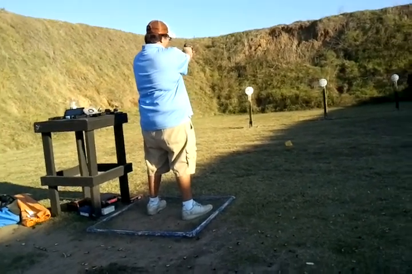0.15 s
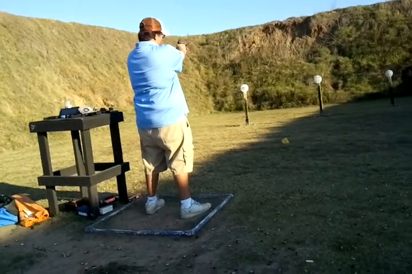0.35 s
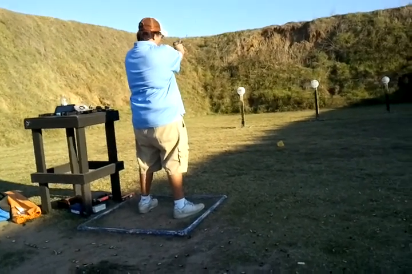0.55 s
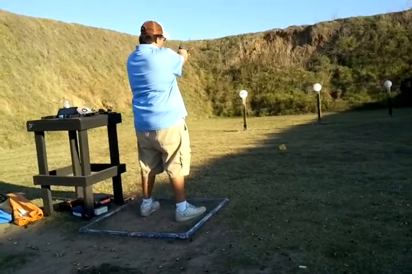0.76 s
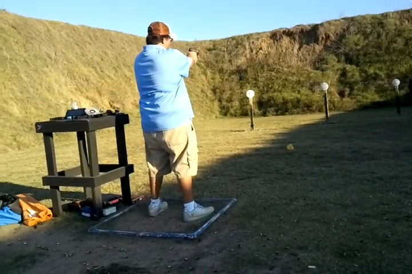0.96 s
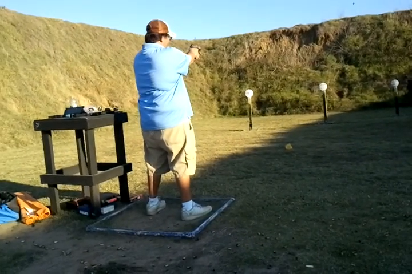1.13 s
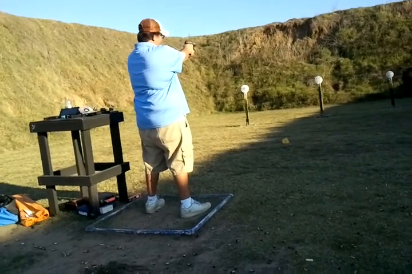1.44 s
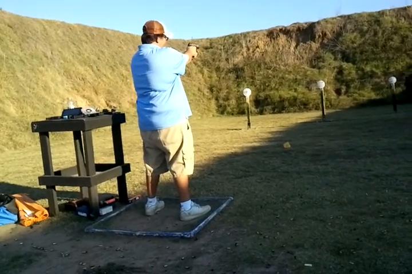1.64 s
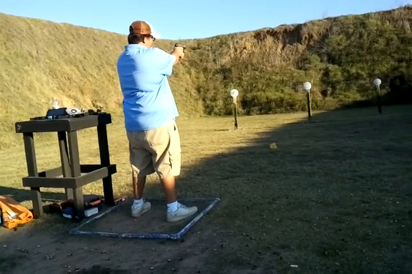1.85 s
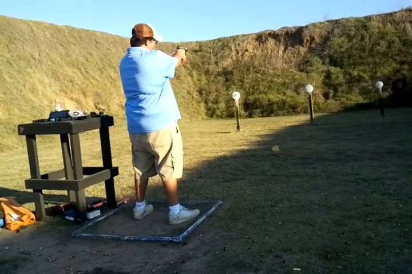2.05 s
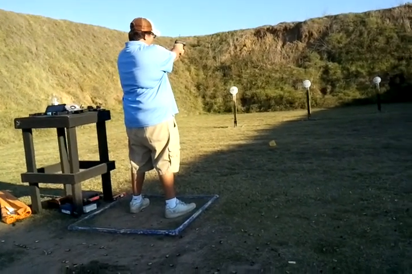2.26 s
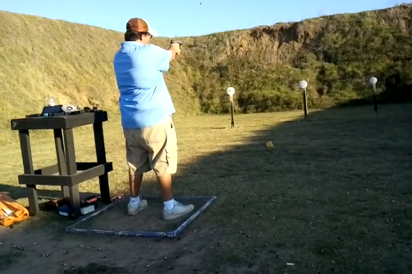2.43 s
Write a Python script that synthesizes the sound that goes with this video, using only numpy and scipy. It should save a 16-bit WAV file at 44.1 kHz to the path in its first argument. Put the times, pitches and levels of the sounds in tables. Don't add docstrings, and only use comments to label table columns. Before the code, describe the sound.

Quiet range ambience with a faint engine idle and far dull hits, then a sharp clipped pistol shot, crackling echoes and a metal target ping; after a pause, a second, longer blast ends the scene.

```python
import sys
import numpy as np
from scipy import signal
from scipy.io import wavfile

SR = 44100
rng = np.random.default_rng(int(sys.argv[2]) if len(sys.argv) > 2 else 0)


def makeup_ratio(level_db):
    decades = np.asarray(level_db, float) / 20
    return 10 ** decades


def to_wav(sig):
    pcm = np.clip(np.atleast_2d(sig), -1, 1) * 32767
    pcm = np.round(pcm).astype(np.int16)
    wavfile.write(sys.argv[1], SR, pcm.T)


N = 114219

# start_s, length_s, slap_delay_s (echo of the back bank), slap_length_s, sticking_depth
SHOTS = [
    (0.7436, .0080, .0735, .0012, 15),
    (2.4548, .0115, .0920, 0.0025, 1.04),
]
# pitch_hz, level_db (per Hz)
FAR_TONE = [(150, -38.5), (250, -13), (835, -8), (1190, -1), (1530, -12), (1660, -4), (2320, -8.5),
            (4560, -4), (7140, -13), (9280, -45), (15700, -120)]
REST, RAIL_LOW, RAIL_HIGH, SWING = -0.214, -0.52, 0.59, 0.53
HIGH_SLOW_S = 0.049


def rms_one(x):
    return x / np.sqrt(np.mean(x ** 2) + 1e-20)


def since(s):
    t = np.arange(N) / SR - s
    return np.maximum(t, 0), t >= 0


def gate(s, length):
    return since(s)[1] & ~since(s + length)[1]


def fade(s, tau):
    t, on = since(s)
    return on * np.exp(-t / max(tau, 1e-4))


def curve(rows, outside=None):
    s, db = np.transpose(rows)
    return np.interp(np.arange(N) / SR, s, db, outside, outside)


def drift(rate_hz):
    r = np.exp(-80 * np.pi * rate_hz / SR)
    slow = signal.lfilter([1], [1, -2 * r, r * r], rng.standard_normal(N // 40 + 2002))[2000:]
    return np.interp(np.arange(N) / 40, np.arange(len(slow)), rms_one(slow))


def coloured(tone, patchy_db):
    hz, db = np.transpose(tone)
    edges = 20 * 2 ** np.arange(0, 8.7, 1 / 3)
    white = rng.standard_normal((2, N + SR))
    out = 0
    for k, (low, high) in enumerate(zip(edges, edges[1:])):
        band_pass = signal.butter(2, [low, high], "band", fs=SR, output="sos")
        band = signal.sosfilt(band_pass, white[k % 2])[SR:]
        level_db = np.interp(np.log(low * high) / 2, np.log(hz), db, -80, -80)
        out = out + band * makeup_ratio(level_db + patchy_db * drift(9.8))
    return rms_one(out)


def ring(s, hz, t60, rise):
    t, on = since(s)
    tone = np.sin(2 * np.pi * hz * t + rng.uniform(0, 5.8))
    return on * tone * makeup_ratio(-60 * t / t60) * (1 - np.exp(-t / rise))


def muzzle_blasts():
    t = np.arange(N) / SR
    lead_s = 0.0018
    strength = 0
    for s, length, slap, slap_s, _ in SHOTS:
        strength = strength + makeup_ratio(-10) * gate(s - lead_s, lead_s) * (t - s + lead_s) / lead_s
        strength = strength + makeup_ratio(28) * gate(s, length) + makeup_ratio(3) * gate(s + slap, slap_s)
    return strength


def boom():
    t = np.arange(N) / SR
    boom_hz = 900
    band_pass = signal.butter(2, [boom_hz / 2, boom_hz * 2], "band", fs=SR, output="sos")
    dull = rms_one(signal.sosfilt(band_pass, rng.standard_normal(N)))
    swell = sum(gate(s, length) * ((t - s) / length) ** 2 for s, length, *_ in SHOTS)
    return makeup_ratio(28) * swell * dull


def sharp_echoes():
    # start_s, level_db, decay_s, pitch_hz
    echoes = [(0.7788, -2, .0012, 5200), (0.7824, 3, .0006, 1800), (0.7925, -2.5, 0.00042, 3500),
              (0.7958, -7, 0.00073, 1600), (0.8001, -4, 0.0011, 1400), (0.804, -14, 0.0013, 4500),
              (.8065, -13.5, 0.0024, 2300), (0.8087, -11, 0.002, 3000), (.887, -13, .004, 4800),
              (.9445, -21, .001, 1000), (.9549, -15.5, 0.0016, 900), (.798, -11.5, 0.0025, 750),
              (2.494, -8, 0.0042, 700), (2.464, -6, 0.0022, 800), (2.4898, -21, .001, 4500),
              (2.4933, -1.5, 0.00045, 1500), (2.5105, -26.5, .0015, 4800), (2.5093, -3.5, .0015, 1300),
              (2.5198, -3, .001, 2200), (2.5192, 1, 0.0013, 1500), (2.5325, -4.5, .001, 2400)]
    # start_s, level_db
    flutter = [(.9945, -20.5), (1.002, -32.5), (1.0095, -15.5), (1.0175, -26), (1.0258, -10.5),
               (1.0335, -21), (1.0412, -25), (1.049, -15), (1.057, -14), (1.065, -15)]
    grit_db = -6
    cracks, grit = 0, 0
    for s, db, tau, hz in echoes:
        cracks = cracks + makeup_ratio(db) * ring(s, hz, np.log(1000) * tau, 0.00032)
        grit = grit + makeup_ratio(db + grit_db) * fade(s, tau)
    for s, db in flutter:
        cracks = cracks + makeup_ratio(db) * ring(s, 5000 * rng.uniform(.95, 1.05), .008, .0004)
        grit = grit + makeup_ratio(db + grit_db) * fade(s, 0.00033)
    return cracks, grit


def scattered_return():
    # start_s, level_db
    first = [(.752, -33), (.776, -22), (.79, -19), (.83, -16.5), (.89, -21), (.91, -29.5), (.97, -37),
             (1.03, -28), (1.1, -41), (1.3, -47)]
    # start_s, level_db
    second = [(2.467, -6.5), (2.49, -23), (2.51, -12.5), (2.53, -27.5), (2.55, -10), (2.575, -18.5),
              (2.59, -19.5)]
    return makeup_ratio(curve(first, -99)) + makeup_ratio(curve(second, -99))


def gunfire():
    # pitch_hz, level_db (per Hz)
    bank_tone = [(120, -44), (200, -12.5), (498, -10.5), (1380, -4.5), (1750, -6), (2430, -6.5),
                 (2950, -16), (5220, 1), (7140, -9.5), (9280, -23.5), (15700, -120)]
    cracks, grit = sharp_echoes()
    strength = muzzle_blasts() + scattered_return() + grit
    return strength * coloured(bank_tone, patchy_db=1.5) + boom() + cracks


def plate():
    # pitch_hz, level_db, t60_s
    modes = [(1680, -30, 0.92), (1706.5, -32, 0.83), (2955, -23, 0.11), (3605, -32.5, 0.046),
             (4436, -19.5, 0.28), (4657, -36, .15), (5200, -38, .12), (6240, -6, .13), (6270, -25, 0.65)]
    # start_s, level_db, tilt_db (per octave)
    arrivals = [
        (.8425, 8, 4.5),
        (.847, -6, 12),
        (.918, -17, -9),
        (.938, -8, -3.5),
        (.956, -21, -7.5),
        (.972, -22, -9),
        (1.03, -29.5, -6),
        (1.299, -42, -16),
        (1.085, -22, -7),
    ]
    top_hz = max(hz for hz, *_ in modes)
    out = 0
    for s, db, tilt_db in arrivals:
        for hz, level_db, t60 in modes:
            level = makeup_ratio(db + level_db + tilt_db * np.log2(hz / top_hz))
            out = out + level * ring(s, hz, t60, 0.002)
    return out


def far_hits():
    # start_s, level_db, pitch_hz, t60_s, crack_db
    hits = [(0.235, -33.5, 1892, 0.064, -36), (0.3824, -25.5, 1238, 0.16, -38.5),
            (0.3823, -26, 1903, 0.031, -49.5), (1.074, -31, 1232, 0.14, -50.5),
            (1.638, -32.5, 1630, 0.22, -71.5), (1.637, -29, 1380, 0.037, -48.5),
            (1.634, -23.5, 5550, 0.031, -72), (1.636, -20.5, 5150, 0.021, -60),
            (1.748, -37, 1350, 0.026, -44), (2.118, -16, 356, 0.0084, -67.5), (2.565, -19, 1480, .2, -76)]
    noise = coloured(FAR_TONE, patchy_db=0.0)
    out = 0
    for s, db, hz, t60, crack_db in hits:
        out = out + makeup_ratio(db) * ring(s, hz, t60, 0.0012) + makeup_ratio(crack_db) * fade(s, 0.025) * noise
    return out


def far_wash():
    # start_s, level_db
    wash = [(0.0, -43.5), (0.16, -42.5), (0.66, -45), (0.79, -46), (0.91, -28.5), (1.06, -44.5),
            (1.25, -42), (1.72, -42.5), (1.95, -44.5), (2.59, -47)]
    return makeup_ratio(curve(wash) + 1.5) * coloured(FAR_TONE, patchy_db=3.0)


def engine():
    # order, level_db
    orders = [(1, -30), (2, -40.5), (3, -44), (4, -48.5), (5, -55)]
    idle_hz = 46.78 * (1 + 0.0335 * drift(2.952))
    phase = 2 * np.pi * np.cumsum(idle_hz) / SR
    out = 0
    for k, db in orders:
        out = out + makeup_ratio(db - 1 + 2.2 * drift(5.3)) * np.sin(k * phase + rng.uniform(0, 5.44))
    return out


def rumble():
    # pitch_hz, level_db (per Hz)
    tone = [(15, -13), (25, -23), (50, -21.5), (71, -19), (118, -26.5), (180, -28), (270, -37), (400, -58),
            (880, -85)]
    return makeup_ratio(-39) * coloured(tone, patchy_db=3.0)


def scene():
    return (gunfire() + plate() + far_hits() + far_wash() + engine() + rumble())[None]


def rails():
    blast = sum(gate(s, length) for s, length, *_ in SHOTS)
    sag = sum(fade(s + slap + slap_s, HIGH_SLOW_S) for s, _, slap, slap_s, _ in SHOTS)
    low = np.where(blast, -SWING, RAIL_LOW)
    high = SWING - (SWING - RAIL_HIGH) * np.minimum(2.0 * sag, 1)
    return low, high


def working_point():
    bias = np.full(N, REST)
    for s, length, slap, slap_s, depth in SHOTS:
        end, back = s + length, s + slap + slap_s
        low = 0.22 - depth * fade(end, 0.0065) - 0.86 * fade(end, 0.027)
        bias += low * gate(end, back - end)
        bias += 0.82 * fade(back, 0.0075) + 0.71 * fade(back, HIGH_SLOW_S) + 0.059 * fade(back, .5)
    return bias


def band_limit(x):
    return signal.sosfilt(signal.butter(12, 16300, fs=SR, output="sos"), x)


def record(dry):
    cutoff_hz, ceiling = 6370, 0.8
    low, high = rails()
    railed = np.clip(dry + working_point(), low, high) + makeup_ratio(-27.5) * np.tanh(dry) - REST
    top_cut = signal.cheby2(10, 70, cutoff_hz * 1.291, fs=SR, output="sos")
    cut = signal.sosfilt(top_cut, railed)
    high_pass = signal.butter(4, 8000, "high", fs=SR, output="sos")
    leak = signal.sosfilt(high_pass, railed * (low < RAIL_LOW))
    mix = np.clip(REST + cut, -ceiling, ceiling) + makeup_ratio(-27) * leak
    return band_limit(mix)


dry = scene()
out = record(dry)
to_wav(out)
```